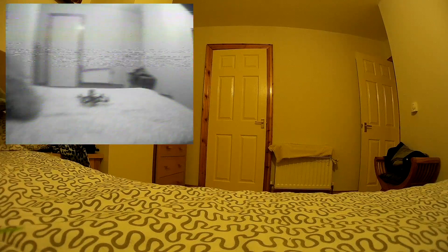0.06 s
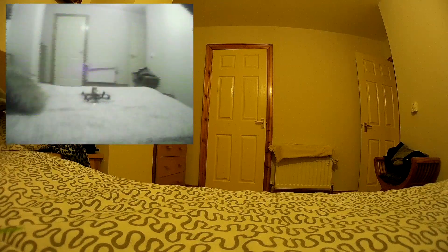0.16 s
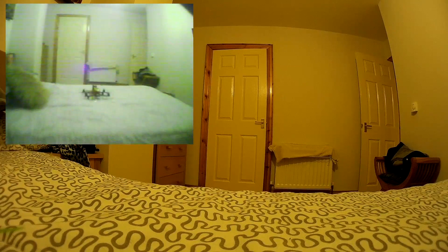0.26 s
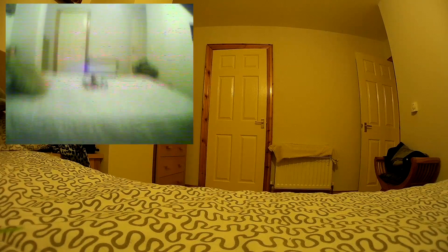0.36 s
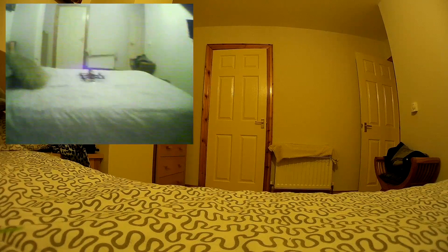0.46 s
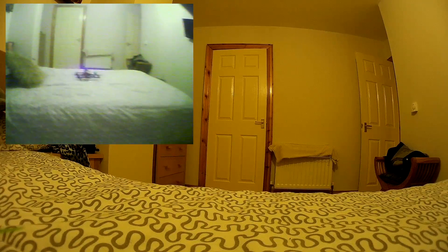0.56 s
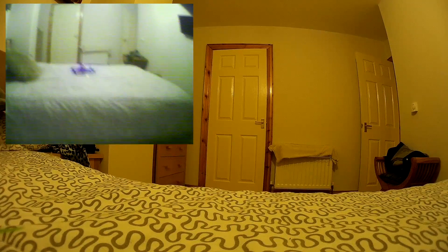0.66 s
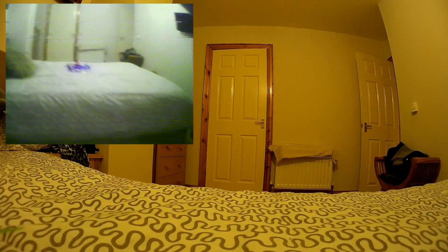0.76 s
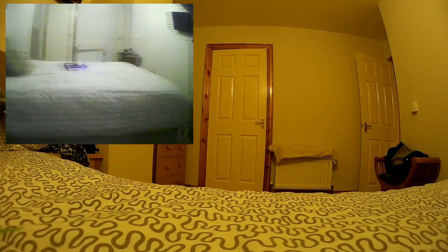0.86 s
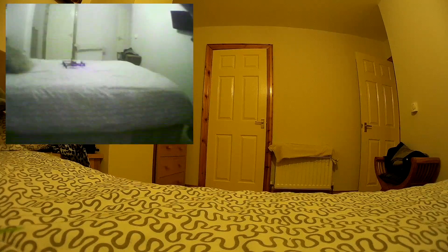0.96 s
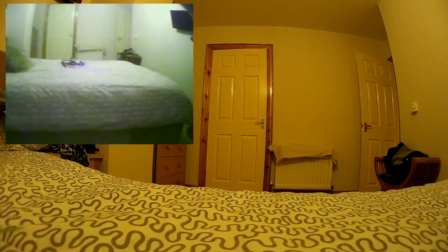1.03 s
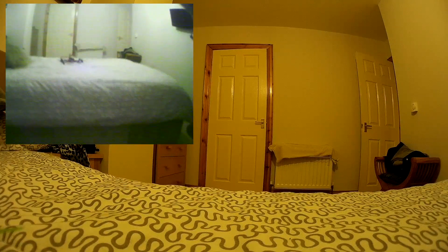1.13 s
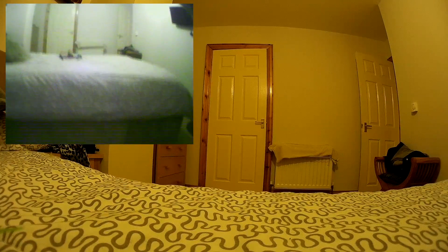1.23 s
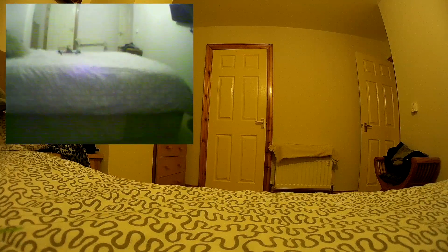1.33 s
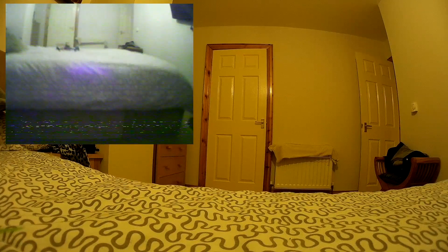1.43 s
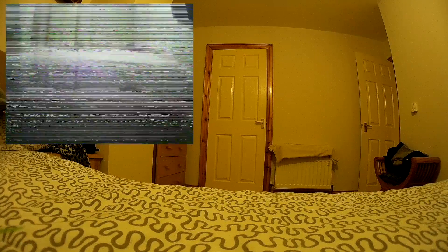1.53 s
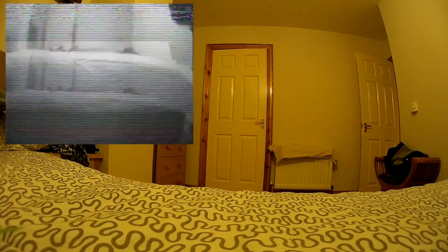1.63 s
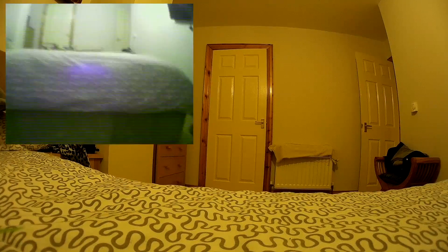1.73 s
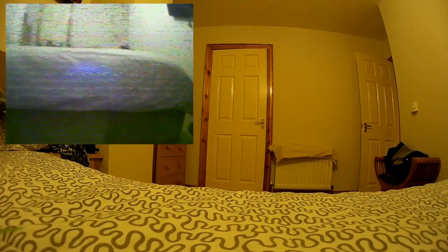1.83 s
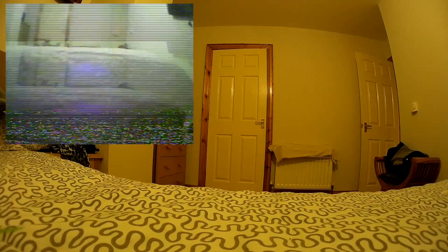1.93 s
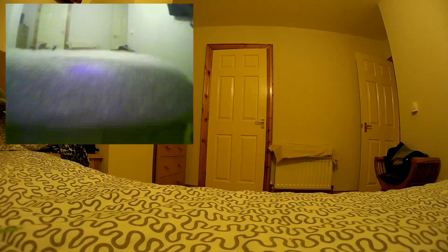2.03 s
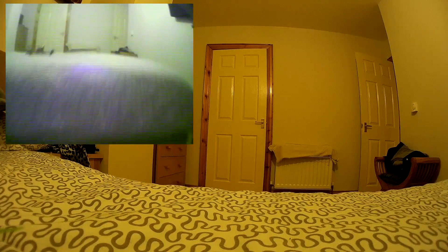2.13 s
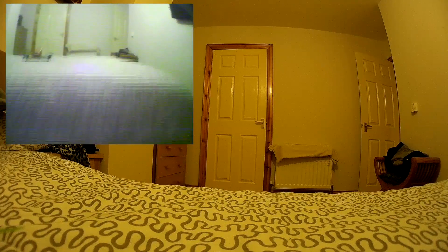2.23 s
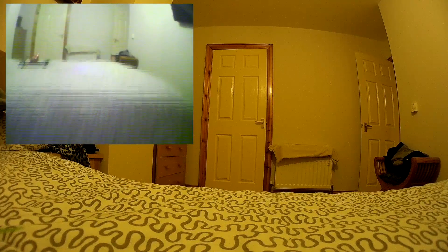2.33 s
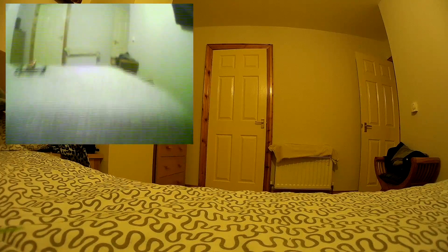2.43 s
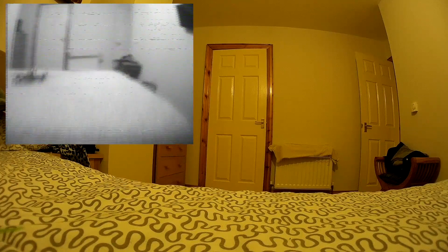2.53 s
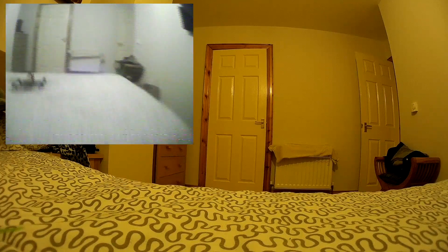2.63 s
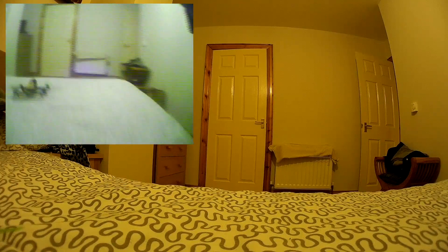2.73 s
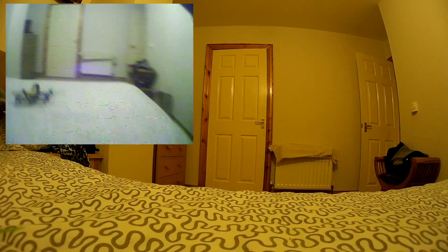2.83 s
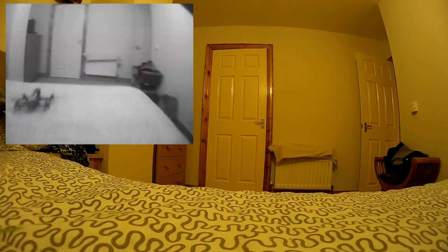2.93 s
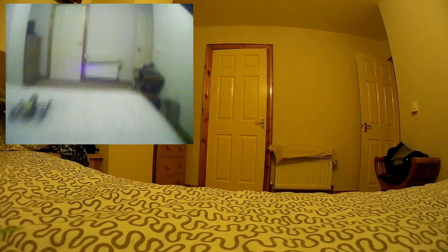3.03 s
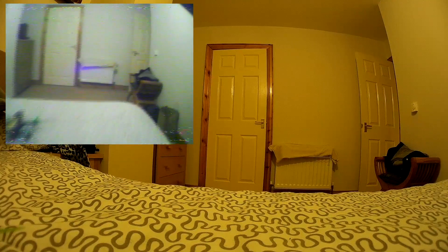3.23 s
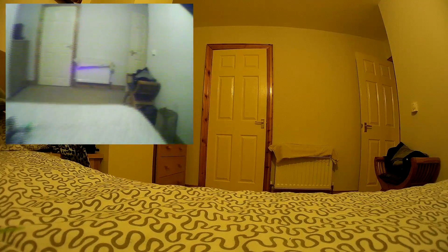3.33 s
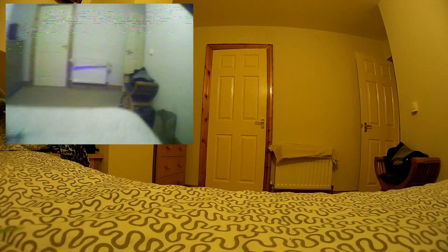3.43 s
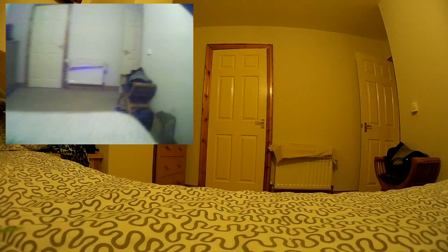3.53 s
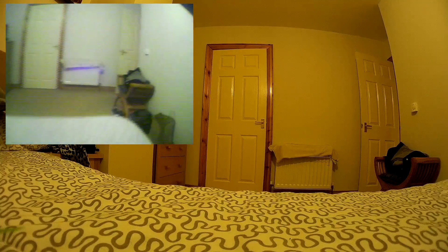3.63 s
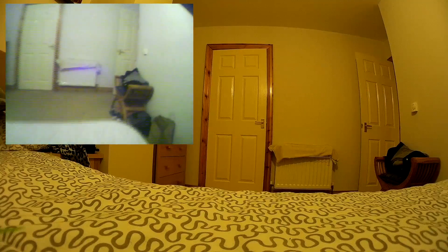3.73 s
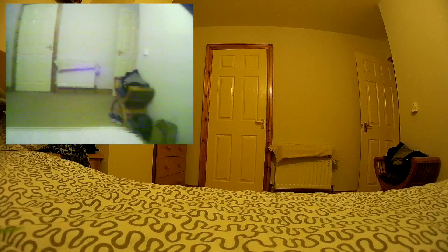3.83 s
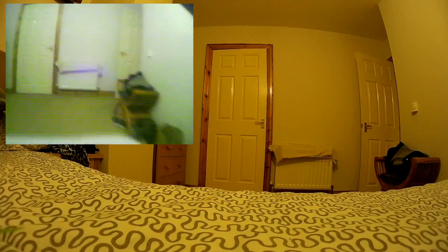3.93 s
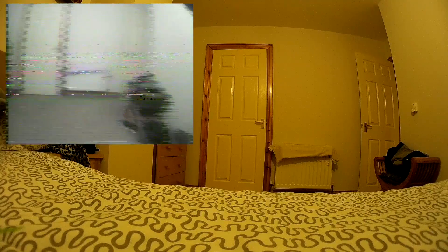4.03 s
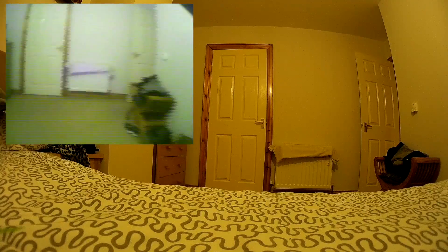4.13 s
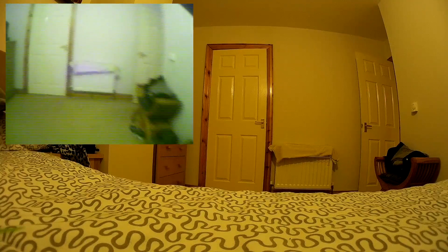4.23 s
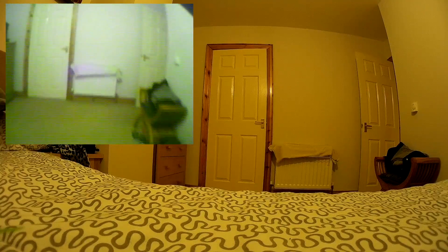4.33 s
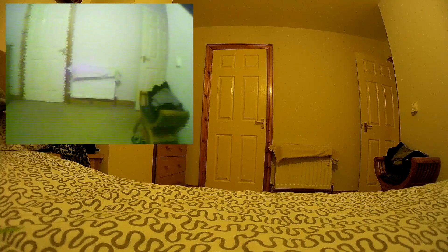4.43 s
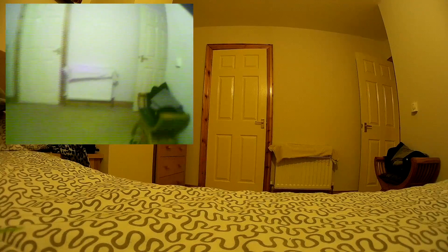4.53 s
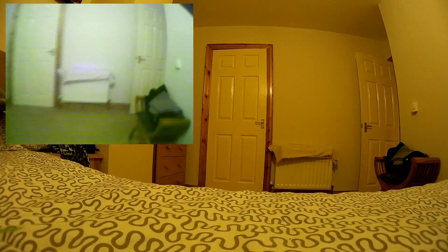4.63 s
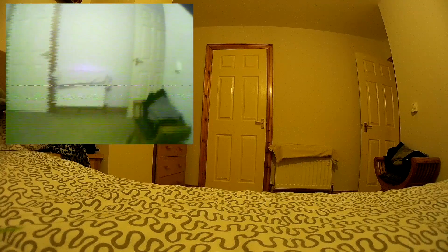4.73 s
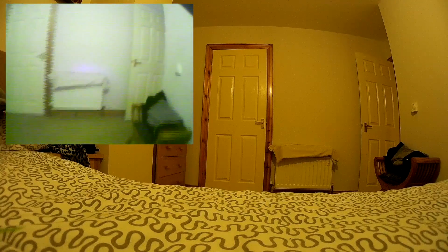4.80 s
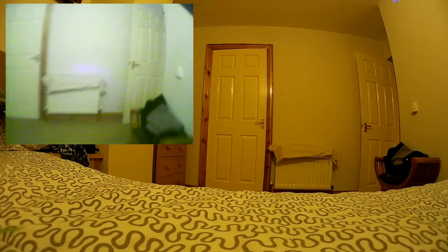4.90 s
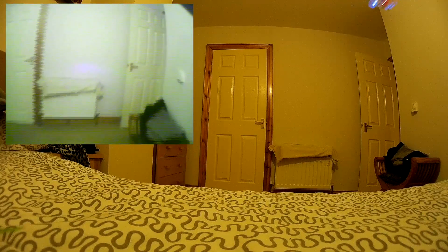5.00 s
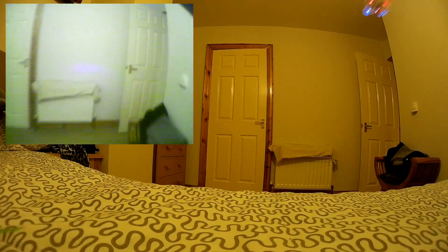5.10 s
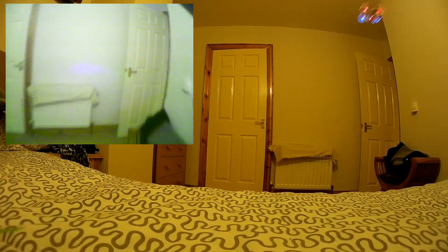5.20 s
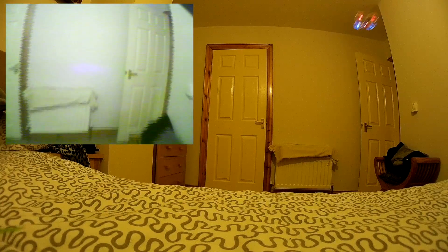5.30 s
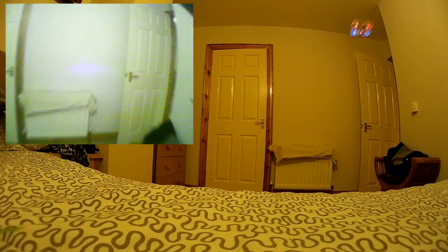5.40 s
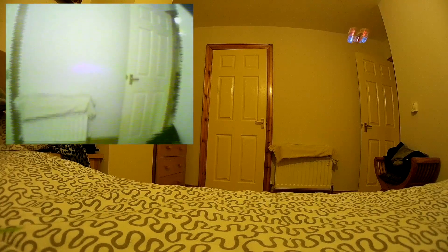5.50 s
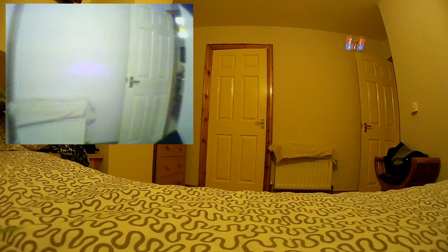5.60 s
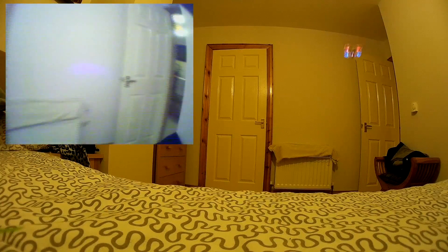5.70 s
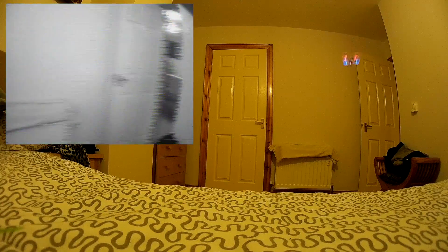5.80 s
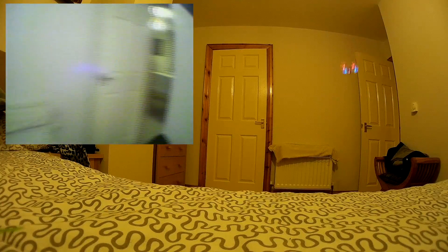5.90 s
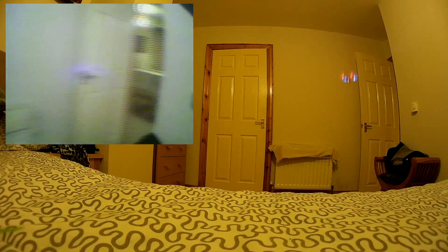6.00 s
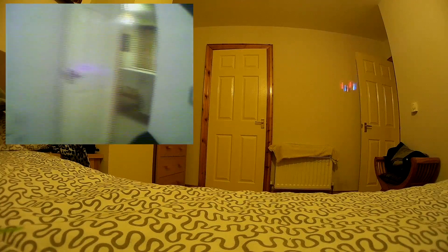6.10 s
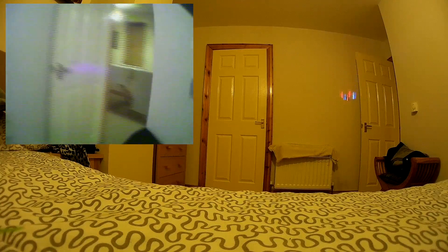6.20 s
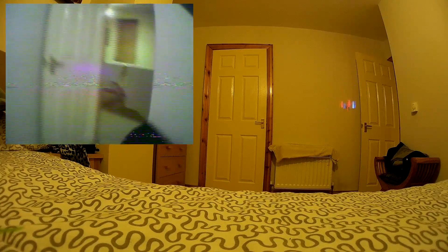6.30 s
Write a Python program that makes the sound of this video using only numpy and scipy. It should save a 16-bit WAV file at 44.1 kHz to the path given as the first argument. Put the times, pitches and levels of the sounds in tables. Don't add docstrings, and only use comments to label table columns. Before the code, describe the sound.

From 0 seconds a tiny drone is already flying in a bedroom: four small propellers buzz around 670 to 790 Hz, slightly apart, so they beat and roughen into a nasal, insect-like whine with many bright harmonics, rasping blade hiss and a faint steady whistle near 7.4 kHz. Pitch dips slightly around 0.5 to 1 second, climbs at 1.5 to 2.2, then sags near 2.6. From about 3 seconds it approaches, rising again just before 4 and loudest around 4.3. Between 4.2 and 4.5 downwash strikes the microphone on the bed in quick, soft low thumps and flaps, with weak remnants until about 5.3. The whine then recedes, the whistle slightly clearer as the craft turns away, and the rotor pitches waver and spread apart near 6.2, still buzzing at the end. Mono, close, with short wall reflections and a very quiet low room floor.

```python
import sys
import numpy as np
from scipy import signal
from scipy.fft import rfft, irfft, next_fast_len
from scipy.io import wavfile
from scipy.ndimage import uniform_filter1d, map_coordinates

SR = 44100
rng = np.random.default_rng(int(sys.argv[2]) if len(sys.argv) > 2 else 0)


def makeup_ratio(level_db):
    decades = np.asarray(level_db, float) / 20
    return 10 ** decades


def transcribe(signal):
    frames = np.atleast_2d(signal).T
    limited = np.clip(frames, -1, 1)
    pcm = np.round(limited * 32767).astype(np.int16)
    wavfile.write(sys.argv[1], SR, pcm)


N = 280035
CONTROL_STEP = 128


def unit(x):
    return x / np.sqrt(np.mean(x ** 2) + 1e-20)


def along(points, hz):
    f, values = np.transpose(points)
    return np.interp(np.log(hz + 1), np.log(f + 1), values)


def curves(rows):
    seconds, *columns = np.transpose(rows)
    return [np.interp(np.arange(N) / SR, seconds, column) for column in columns]


def fine(coarse):
    return np.interp(np.arange(N), np.arange(0, N + CONTROL_STEP, CONTROL_STEP), coarse)


def wobble(rate_hz, depth_db=None):
    coarse = np.arange(0, N + CONTROL_STEP, CONTROL_STEP)
    curve = map_coordinates(rng.standard_normal(400), [coarse * rate_hz / SR])
    if depth_db is None:
        return curve
    return makeup_ratio(depth_db * curve)


def filtered(x, response):
    size = next_fast_len(N + SR // 2)
    hz = np.fft.rfftfreq(size, 1 / SR)
    return irfft(rfft(x, size) * response(hz), size)[..., :N]


def noise(spectrum):
    return unit(filtered(rng.standard_normal(N), lambda hz: makeup_ratio(along(spectrum, hz))))


# order [shaft turns], level [dB]
SHAFT_LINES = [(1, -18.5), (2, -2), (3, -19.5), (4, 3.5), (5, -16), (6, 1), (7, -18.5), (8, -2), (9, -28.5),
               (10, -4), (11, -17.5), (12, -9), (13, -40), (14, -3.5), (15, -20), (16, -4.5), (17, -12),
               (18, -6), (19, -18), (20, -11), (21, -22.5), (22, -9), (23, -14), (24, -16.5), (26, -17),
               (28, -16.5), (30, -22.5), (32, -20.5)]
# f [Hz], level [dB per Hz]
BLADE_HISS = [(1470, -34), (2500, -12.5), (2870, -4), (3120, -8.5), (3660, -1.5), (4240, -4), (4570, -9),
              (5710, 1.5), (7070, -12), (8180, -3), (9100, -10), (10400, -4.5), (11100, -14.5),
              (12400, -13.5), (15500, -29)]


def rotor(table, flutter_hz, fade_db, break_db, hiss_db, chop):
    blade_hz, facing_db = curves(table)
    blade_hz = uniform_filter1d(blade_hz, size=2500)
    blade_hz = blade_hz + flutter_hz * fine(wobble(22) + 1.2 * wobble(6))
    shaft_phase = np.pi * np.cumsum(blade_hz) / SR
    lines = np.zeros(N)
    for order, level_db in SHAFT_LINES:
        fading = wobble(3, fade_db)
        breaking = wobble(18, break_db * min(order / 12, 1))
        tone = np.sin(order * shaft_phase + 2 * np.pi * rng.random())
        lines += fine(makeup_ratio(level_db) * fading * breaking) * tone
    chopped = 1 + chop * np.cos(2 * shaft_phase)
    return makeup_ratio(facing_db) * lines + makeup_ratio(hiss_db) * noise(BLADE_HISS) * chopped


# f [Hz], width [Hz], level [dB]
FRAME_MODE = [
    (1926, 264, -3.5),
]


def frame(motors):
    def mode(hz):
        total = 0
        for centre_hz, width_hz, level_db in FRAME_MODE:
            damping = hz * width_hz
            total = total + makeup_ratio(level_db) * (damping / np.hypot(centre_hz ** 2 - hz ** 2, damping)) ** 2
        return total

    rattle = unit(filtered(rng.standard_normal(N), mode))
    return makeup_ratio(0.5) * fine(wobble(15, 1.505)) * rattle + makeup_ratio(17.5) * filtered(motors, mode)


# f [Hz], t60 [s]
WALL_DECAY = [
    (300, 0.69),
    (2000, 0.65),
    (10000, 0.23),
]


def room(x, wet_db):
    hz, t, grains = signal.stft(rng.standard_normal(SR // 2), SR, nperseg=256)
    decay = makeup_ratio(-60 * t / along(WALL_DECAY, hz)[:, None])
    tail = signal.istft(grains * decay, SR, nperseg=256)[1]
    return x + makeup_ratio(wet_db) * signal.fftconvolve(x, tail / np.linalg.norm(tail))[:N]


# t [s], nearness [dB], bed-bounce lift f [Hz], lift level [dB],
# turned away [0-1]
FLIGHT_PATH = [(0, 1, 4120, 3, .5), (0.501, -1.5, 3950, 5, 0.5), (1.3, 0, 4310, 6, 0),
               (1.6, 1, 4035, 4, 0.39), (2, 0.5, 4830, -0.2, 0), (2.55, -1, 5200, -1.7, .1),
               (3.05, 1, 5436, -1.5, 0.01), (3.55, 2.5, 5794, -0.5, 0), (3.9, 4, 5520, 4.5, 0),
               (4.35, 5, 5300, 11.5, 0.33), (4.75, 2.5, 4947, 3.5, 0.7), (5, 1, 6074, 3.5, 1),
               (5.5, -0.5, 6400, 6, 0.65), (5.8, -1, 6660, 4.5, 0.59), (6.35, -2.5, 6475, -0.5, 0.82)]


def bounced(x, low_width, high_width, patchy_db):
    upper_hz, facing_db, lost_when_away_db = 8360, 5, 8.5
    brighter_db = 0.6
    hz, t, z = signal.stft(x, SR, nperseg=512)
    hz = hz[:, None]
    seconds, *columns = np.transpose(FLIGHT_PATH)
    near_db, low_hz, low_db, away = (np.interp(t, seconds, column) for column in columns)

    def bump(centre_hz, width):
        return np.exp(-(np.log((hz + 1) / centre_hz) / width) ** 2)

    low_lift_db = low_db * bump(low_hz, low_width)
    high_lift_db = (facing_db - lost_when_away_db * away) * bump(upper_hz, high_width)
    air_db = brighter_db * near_db * np.log2(np.maximum(hz / upper_hz, 1))
    patches = uniform_filter1d(rng.standard_normal(z.shape), size=12, axis=0)
    patches = unit(uniform_filter1d(patches, size=50, axis=1))
    patches_db = patchy_db * patches * (1 + hz / upper_hz)
    colour_db = low_lift_db + high_lift_db + air_db + patches_db
    return signal.istft(z * makeup_ratio(colour_db), SR, nperseg=512)[1][:N]


# t [s], blade-pass f [Hz], level towards microphone [dB]
FRONT_LEFT_ROTOR = [(0, 794, 1), (.3, 778, -4), (.47, 737.3, 2.5), (.76, 709.7, -2.5), (1.08, 742.3, -0.5),
                    (1.38, 733, -2.5), (1.5, 784.7, 1), (2.2, 793, -5), (2.6, 747, -8), (2.92, 723.4, 1),
                    (3.01, 742, 4), (3.58, 719, 0), (3.92, 788.2, -2), (4.4, 741.9, -1), (5.08, 760.7, -1),
                    (5.4, 722.8, -6), (5.82, 751.5, 1.5), (6.2, 678, -7.5)]
FRONT_RIGHT_ROTOR = [(0, 745.6, 4.5), (.18, 744.6, -0.5), (0.421, 697.7, 0), (.68, 698, -5.5),
                     (1.349, 715.8, -3), (1.62, 787.2, -0.5), (1.881, 760.8, -2.5), (2.2, 772.3, 1),
                     (2.43, 710.3, 3.5), (2.63, 742.3, 4), (2.93, 706.6, -1), (3.12, 736, -1.5),
                     (3.55, 712.6, -1.5), (3.95, 771.5, 0.5), (4.55, 725.9, -2.5), (5.62, 703, -4.5),
                     (5.81, 734.7, 1), (6.18, 616.7, -2)]
REAR_LEFT_ROTOR = [(0, 680.4, -10.5), (.23, 713.3, -5.5), (0.482, 687.2, 0.5), (.85, 692, 3),
                   (0.978, 717.5, 2.5), (1.38, 708.8, -2.5), (1.62, 773, -14), (2.22, 755.5, -6.5),
                   (2.64, 688, -4.5), (2.96, 714.3, -3), (3.5, 712, -2.5), (4.349, 736.3, -9.5),
                   (4.6, 719, -5), (5.08, 740.2, 3), (5.46, 678.8, -1.5), (5.79, 728, -7.5),
                   (5.96, 692.6, -9), (6.2, 741, 4.5)]
REAR_RIGHT_ROTOR = [(0, 667.3, 0.5), (0.199, 713.7, 7), (0.729, 680.8, -3.5), (1.33, 697.2, 2),
                    (1.6, 731.6, -1), (1.92, 756.3, -1.5), (2.21, 753.2, 2), (2.64, 681.8, -0.5),
                    (2.94, 697.4, -2), (3.08, 681.4, -5.5), (3.679, 717, -3.5), (3.96, 685.4, 1),
                    (4.26, 728.2, -3.5), (4.4, 702, -6), (4.8, 716, -7), (5.62, 678.2, -2),
                    (5.82, 643.2, 0), (6.16, 746.5, 5)]
# f [Hz], level [dB per Hz]
AIRFLOW_HUM = [(250, -12), (450, -6.5), (1000, -4.5), (1500, 0.5), (2500, 2), (3200, -6.5), (4500, -42)]
REGION_EDGES = [
    520,
    1000,
    1700,
    3300,
]
REGION_LEVEL = [
    -58.5,
    -41.5,
    -39.5,
    -34,
    -28.5,
]
REGION_GROWTH = [0.57, 0.9, 1.4, 1.67, 1.11]
REGION_SWING = [-0.15, 0.26, -1.03, .8, -0.033]
# t [s], bank [dB], dip [dB]
CRAFT_ATTITUDE = [(0, 2, -3), (.45, 0, 0.5), (.85, 4, 1), (1.3, 2, -5), (1.6, -2.5, -5), (1.9, -1, -10),
                  (2.1, 4, -1), (2.6, -2, 8.5), (3, 1.5, 2), (3.5, -3.5, 2), (3.7, 4.5, 5), (4.1, 0.5, 3.5),
                  (4.5, -3, 4.5), (4.9, -1, 0), (5.25, 0, 7), (5.8, 1, 0.5), (6.2, -3.5, 0.5)]


def drone():
    motors = np.zeros(N)
    for table in (FRONT_LEFT_ROTOR, FRONT_RIGHT_ROTOR, REAR_LEFT_ROTOR, REAR_RIGHT_ROTOR):
        motors += rotor(table, flutter_hz=1.8, fade_db=2, break_db=3, hiss_db=-2.5, chop=0.3)
    craft = room(motors + frame(motors), wet_db=-6)
    craft = bounced(craft, low_width=0.11, high_width=0.059, patchy_db=0.87)

    below = [filtered(craft, lambda hz: 1 / (1 + (hz / edge) ** 12)) for edge in REGION_EDGES]
    regions = np.diff([0 * craft, *below, craft], axis=0)
    near_db = curves(FLIGHT_PATH)[0]
    bank_db, dip_db = curves(CRAFT_ATTITUDE)
    heard_db = np.outer(REGION_GROWTH, near_db) + np.outer(REGION_SWING, bank_db) + np.c_[REGION_LEVEL]
    heard_db[0] += dip_db
    mix = makeup_ratio(heard_db[-1] - 21.5) * noise(AIRFLOW_HUM)
    for level_db, region in zip(heard_db, regions):
        mix = mix + makeup_ratio(level_db) * unit(region)
    return mix


def switching():
    start_hz, sag_hz_per_s = 7402, 2.5
    facing_db, behind_db, octave_db = -52, 10, -19
    away = curves(FLIGHT_PATH)[3]
    hz = start_hz - sag_hz_per_s * np.arange(N) / SR + 4 * fine(wobble(8.7))
    phase = 2 * np.pi * np.cumsum(hz) / SR
    whistle = np.sin(phase) + makeup_ratio(octave_db) * np.sin(2 * phase)
    return np.sqrt(2) * makeup_ratio(facing_db + behind_db * away) * fine(wobble(5, 2.5)) * whistle


# f [Hz], level [dB per Hz]
FLOOR_SPECTRUM = [(12, -38), (20, -4), (90, -1), (277, -3), (364, -3), (421, -12), (620, -16), (810, -34),
                  (1360, -120)]


def quiet_room():
    return makeup_ratio(-63) * noise(FLOOR_SPECTRUM)


# f [Hz], level [dB per Hz]
THUD_SPECTRUM = [
    (12, -24),
    (25, 0),
    (90, -2.5),
    (140, -16),
    (300, -52),
]
# f [Hz], level [dB per Hz]
FLAP_SPECTRUM = [(60, -46), (120, 0.5), (260, 0), (500, -8.5), (900, -16.5), (1800, -57)]
# t [s], spread [s], thud level [dB], flap level [dB]
DOWNWASH_GUSTS = [(4.14, .025, -67, -58), (4.2, 0.028, -45, -48), (4.245, 0.021, -51, -46),
                  (4.29, 0.024, -42.5, -41), (4.345, .025, -54, -38), (4.39, .03, -35.5, -35.5),
                  (4.45, 0.034, -37, -52), (4.53, 0.048, -56, -54), (4.67, 0.027, -48, -47.5),
                  (4.74, 0.061, -56, -59), (5.07, 0.046, -56, -64), (5.21, 0.033, -54, -66),
                  (5.29, 0.019, -51, -64)]


def downwash():
    t = np.arange(N) / SR
    centre_s, spread_s, thud_db, flap_db = np.transpose(DOWNWASH_GUSTS)
    swells = np.exp(-((t[:, None] - centre_s) / spread_s) ** 2)
    lumps = fine(wobble(55, 2))
    thuds = swells @ makeup_ratio(thud_db) * unit(lumps * noise(THUD_SPECTRUM))
    flaps = swells @ makeup_ratio(flap_db) * unit(lumps * noise(FLAP_SPECTRUM))
    return thuds + flaps


def scene():
    mono = drone() + switching() + quiet_room() + downwash()
    return np.array([mono, mono])


def low_pass(x):
    return signal.sosfilt(signal.butter(12, 15690, fs=SR, output="sos"), x)


def record(dry):
    limited = filtered(dry, lambda hz: hz < 15690)
    return low_pass(limited)


dry = scene()
out = record(dry)
transcribe(out)
```